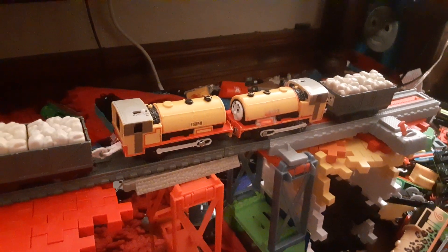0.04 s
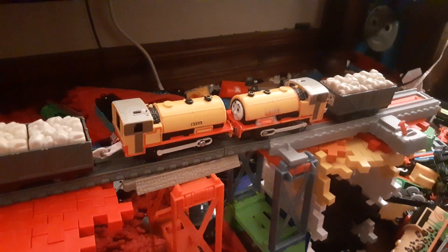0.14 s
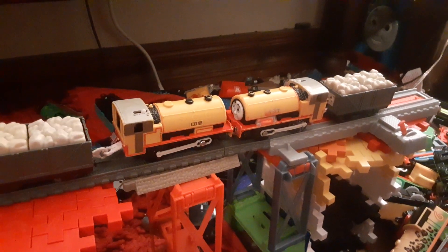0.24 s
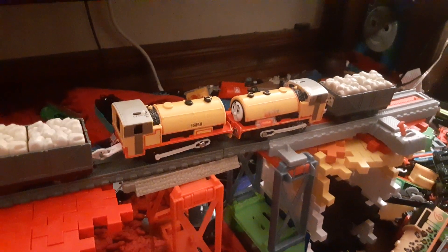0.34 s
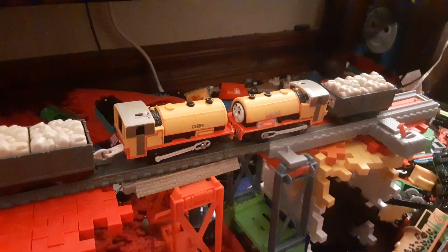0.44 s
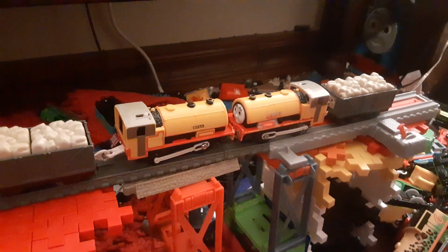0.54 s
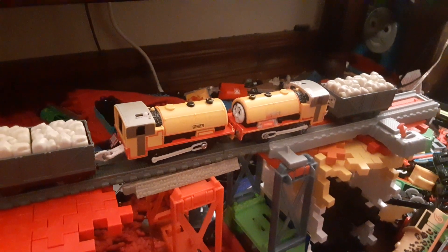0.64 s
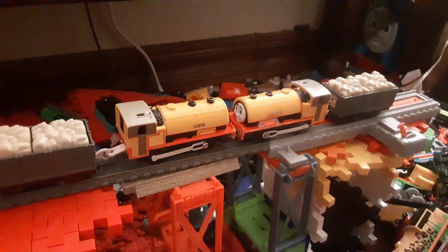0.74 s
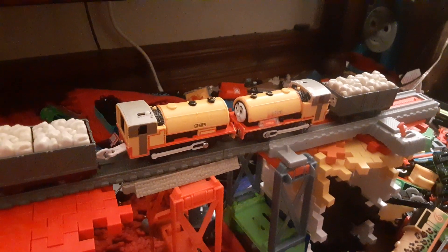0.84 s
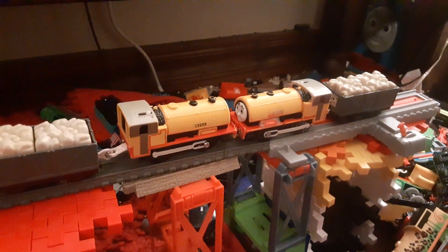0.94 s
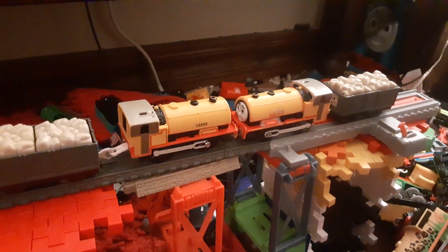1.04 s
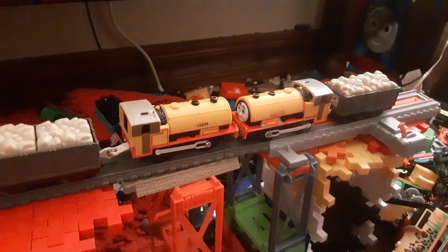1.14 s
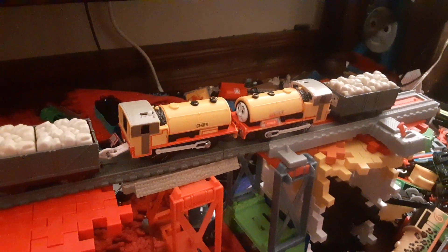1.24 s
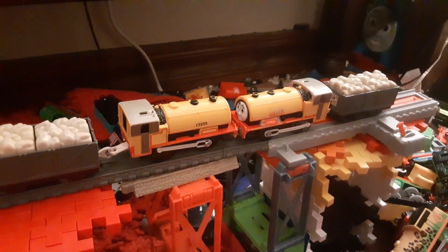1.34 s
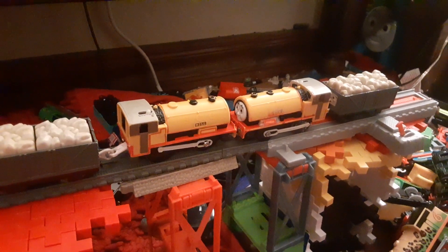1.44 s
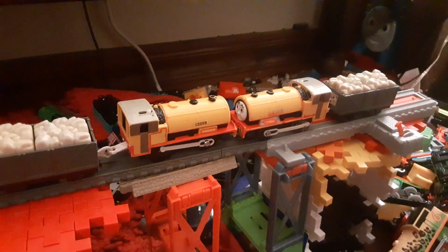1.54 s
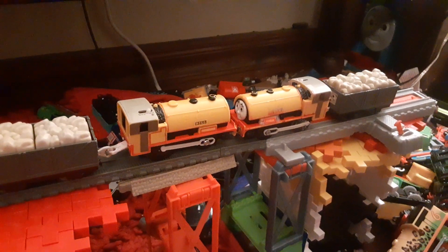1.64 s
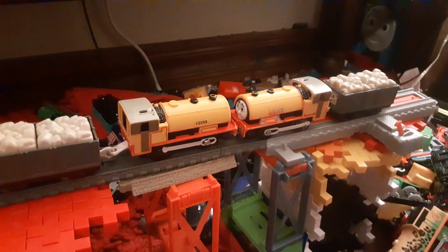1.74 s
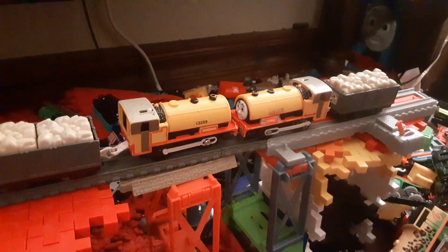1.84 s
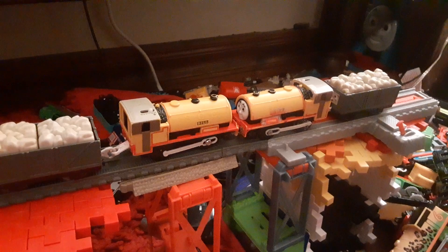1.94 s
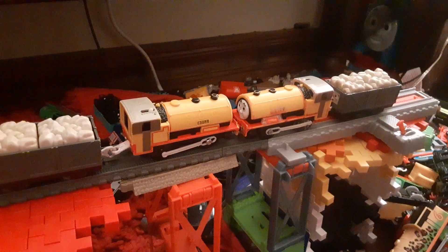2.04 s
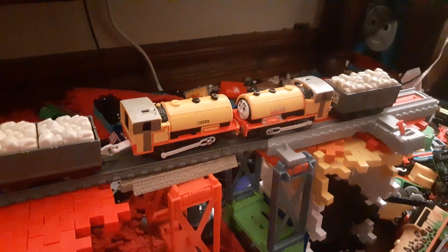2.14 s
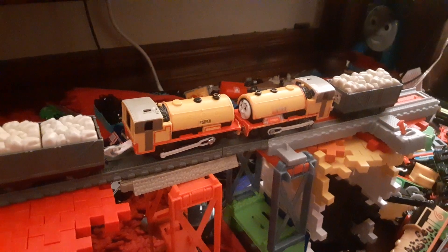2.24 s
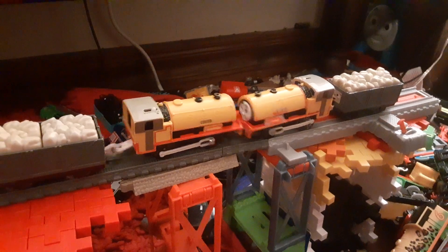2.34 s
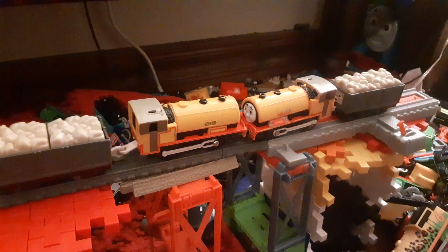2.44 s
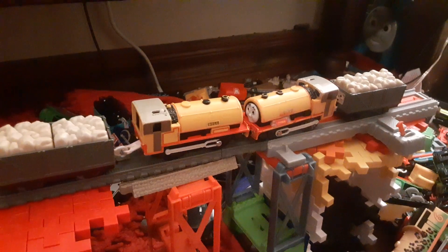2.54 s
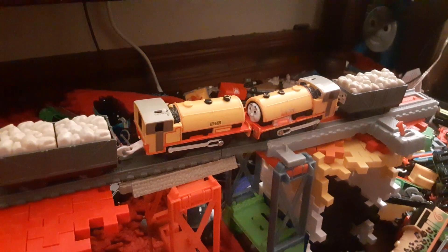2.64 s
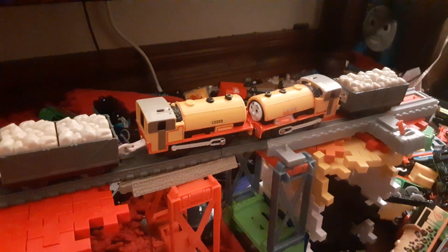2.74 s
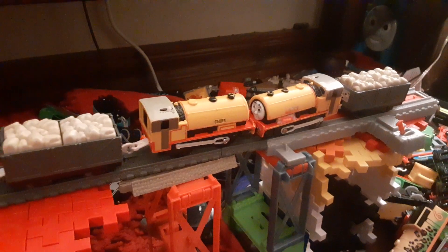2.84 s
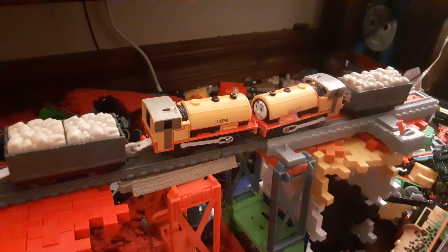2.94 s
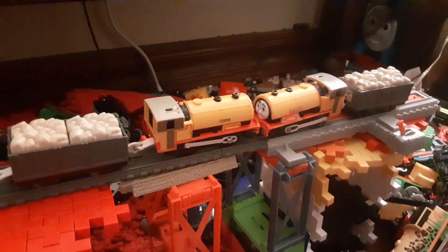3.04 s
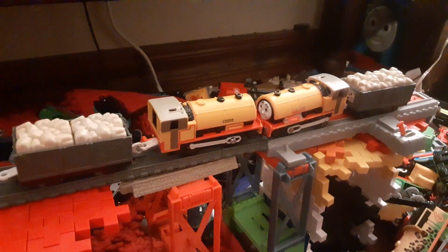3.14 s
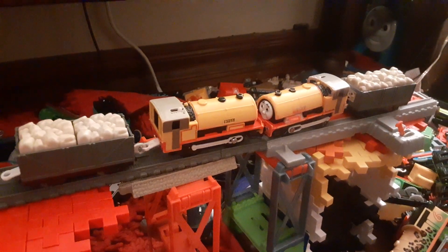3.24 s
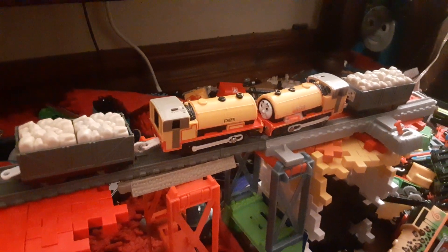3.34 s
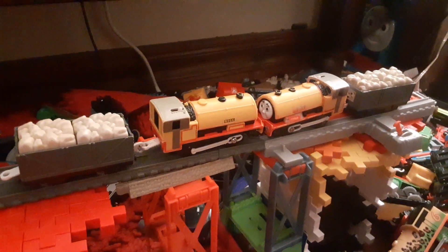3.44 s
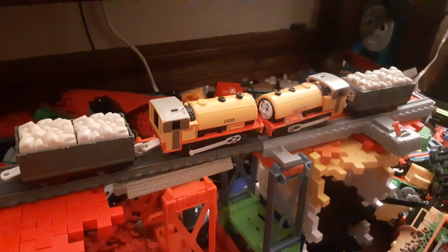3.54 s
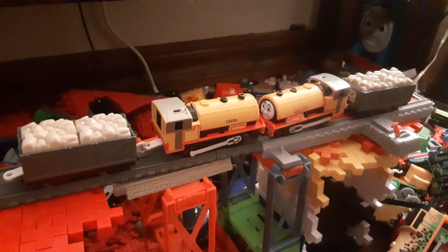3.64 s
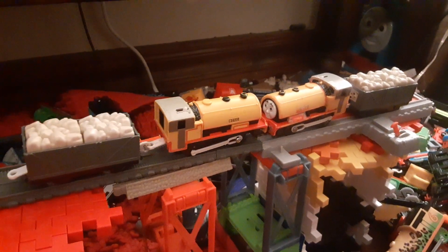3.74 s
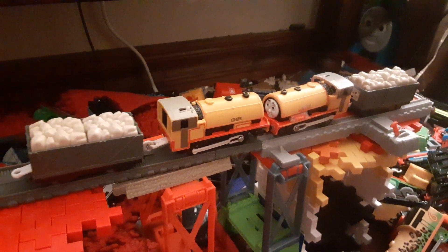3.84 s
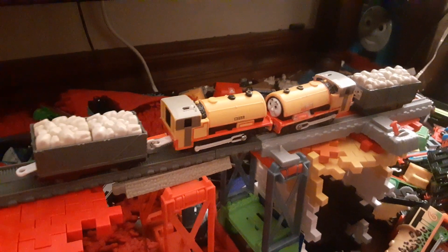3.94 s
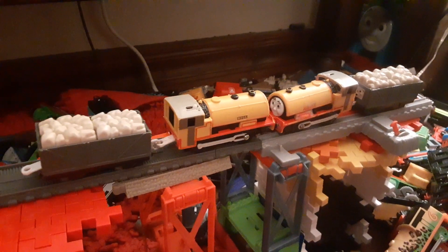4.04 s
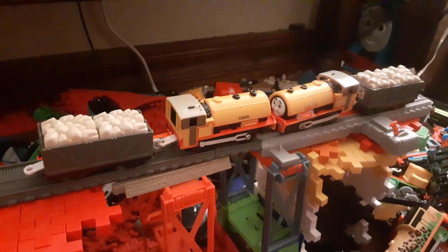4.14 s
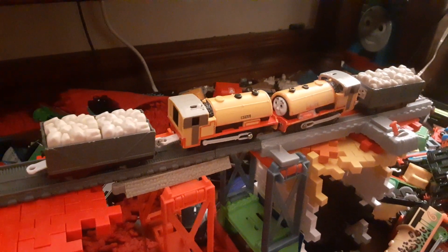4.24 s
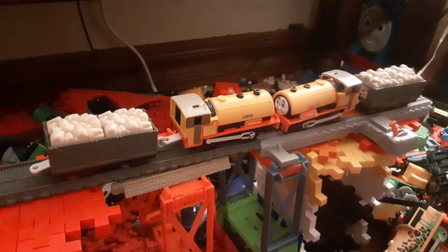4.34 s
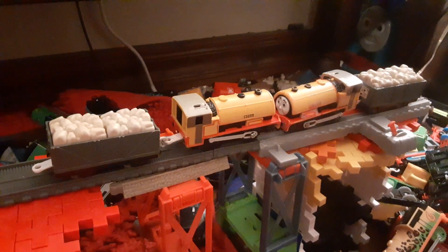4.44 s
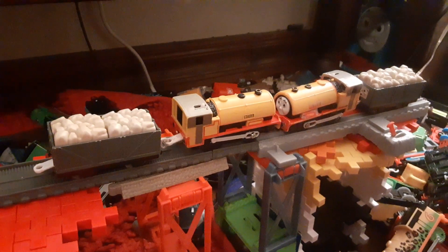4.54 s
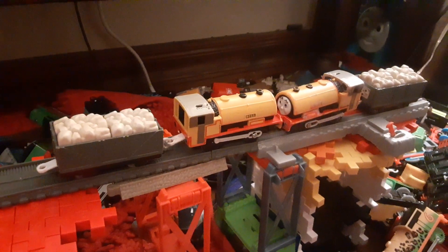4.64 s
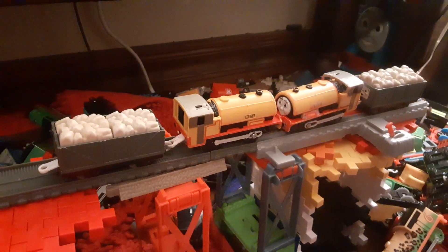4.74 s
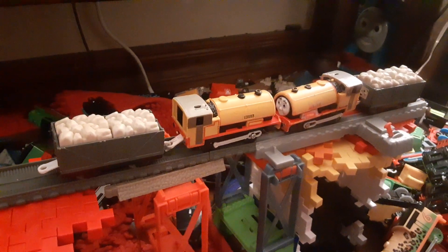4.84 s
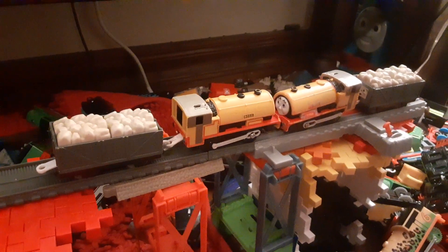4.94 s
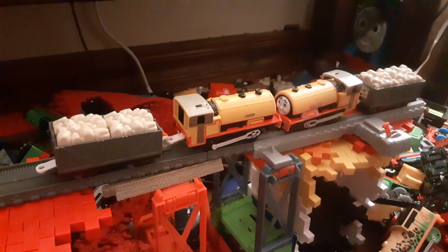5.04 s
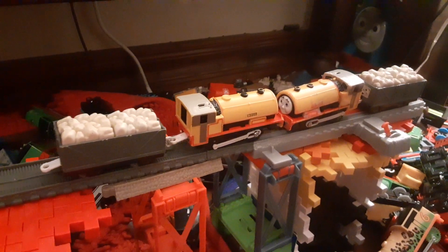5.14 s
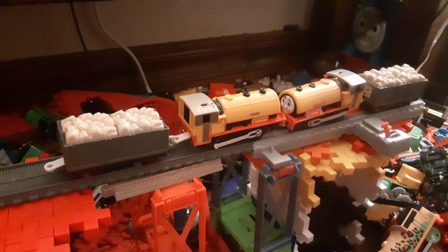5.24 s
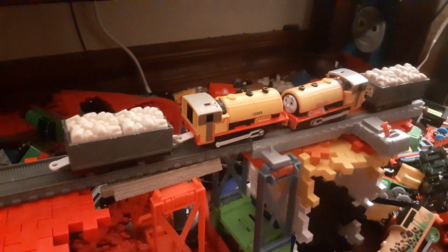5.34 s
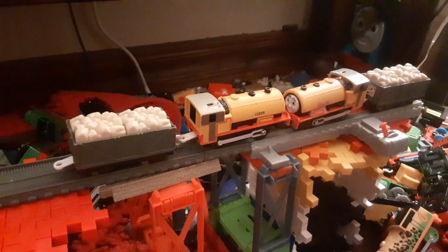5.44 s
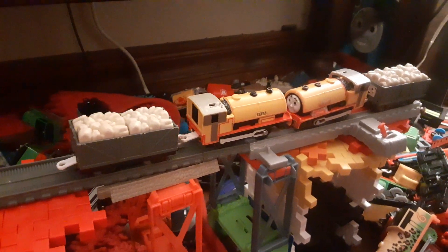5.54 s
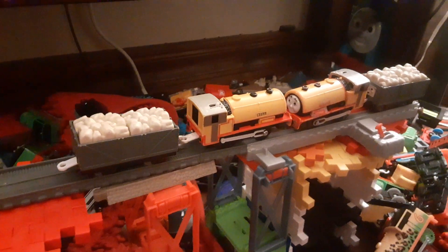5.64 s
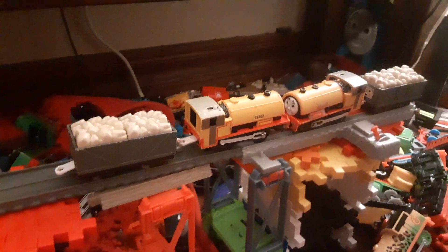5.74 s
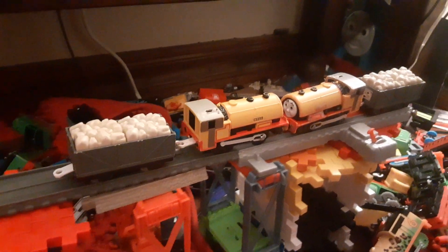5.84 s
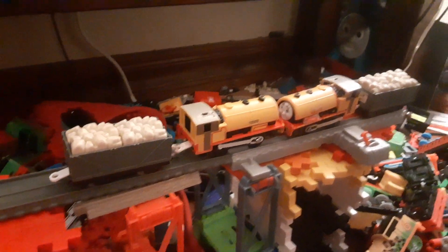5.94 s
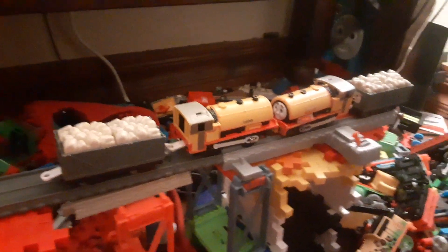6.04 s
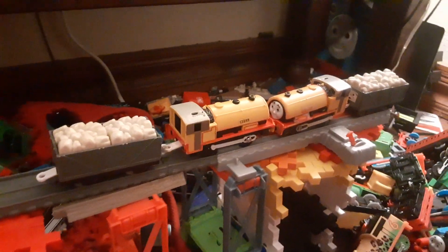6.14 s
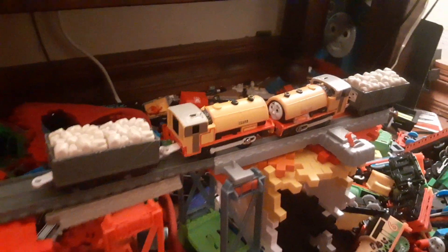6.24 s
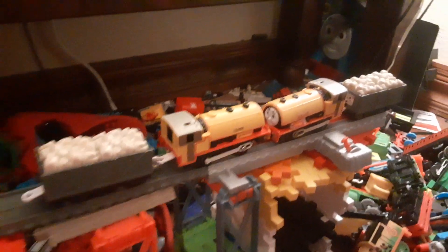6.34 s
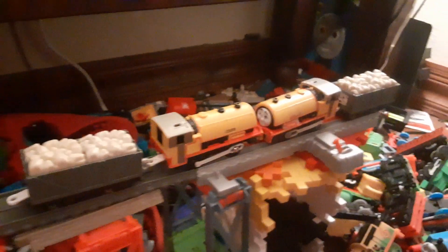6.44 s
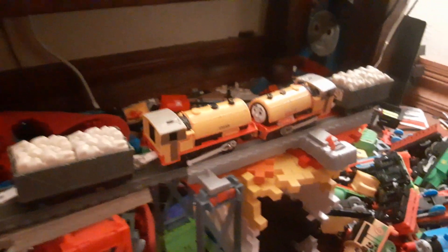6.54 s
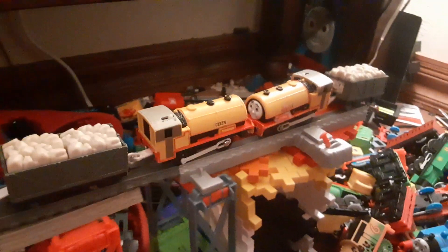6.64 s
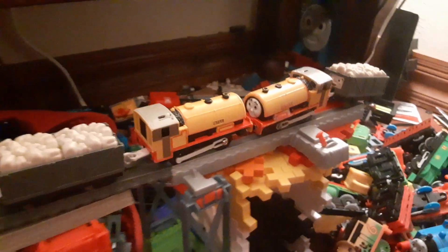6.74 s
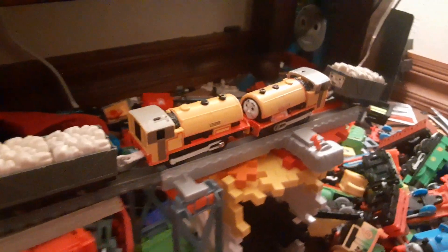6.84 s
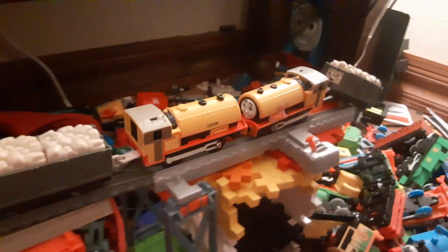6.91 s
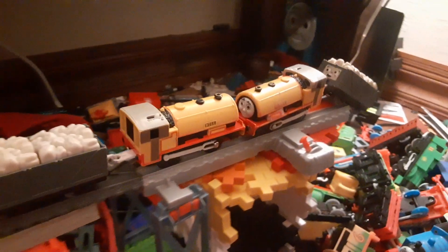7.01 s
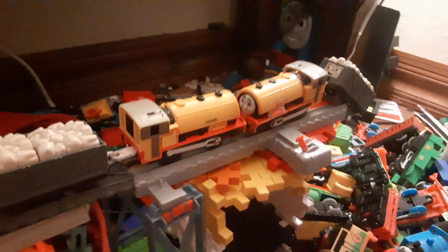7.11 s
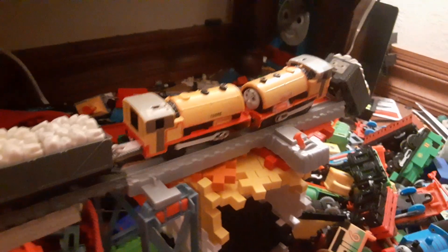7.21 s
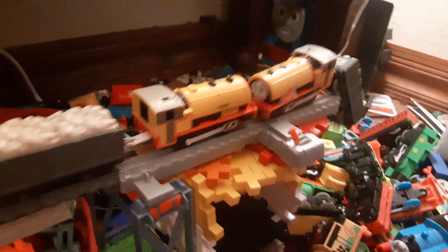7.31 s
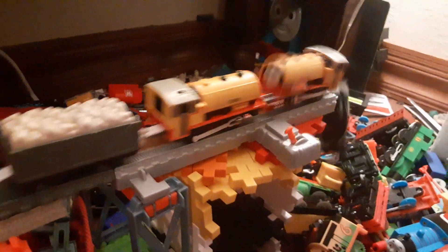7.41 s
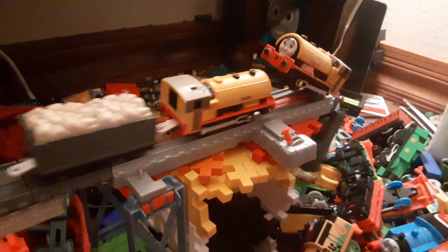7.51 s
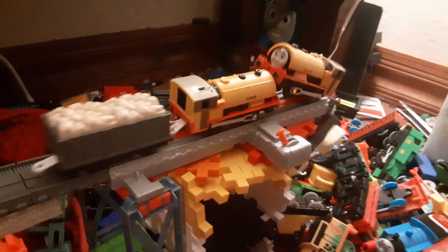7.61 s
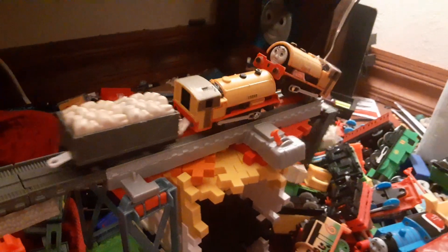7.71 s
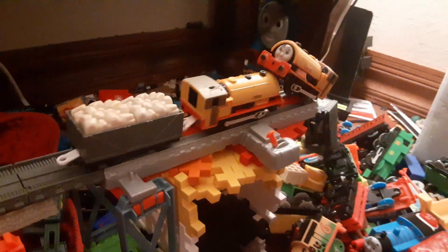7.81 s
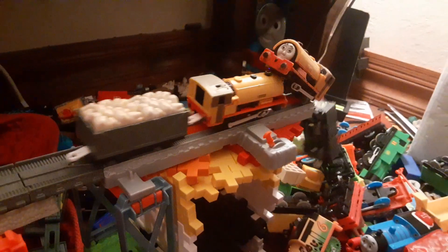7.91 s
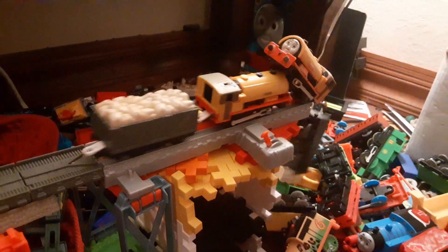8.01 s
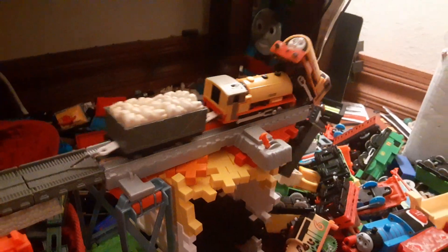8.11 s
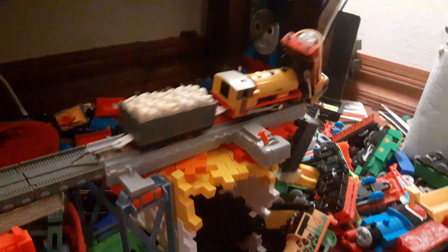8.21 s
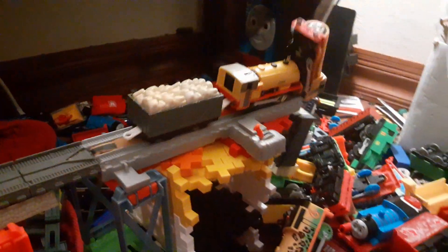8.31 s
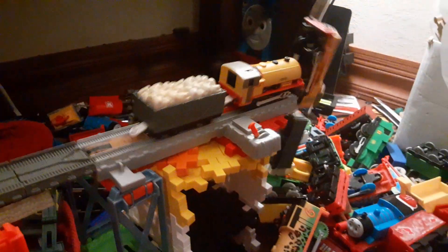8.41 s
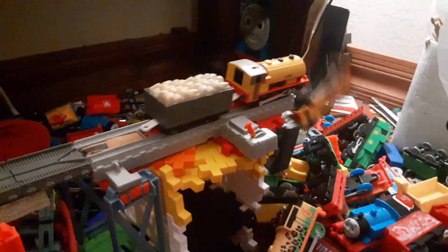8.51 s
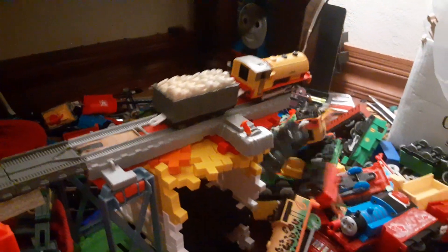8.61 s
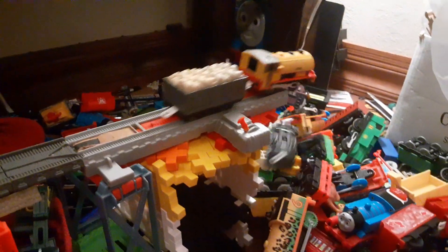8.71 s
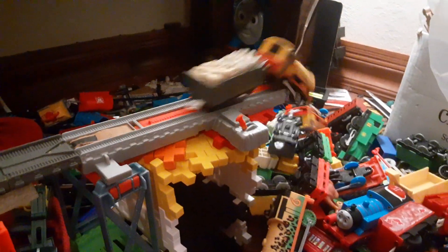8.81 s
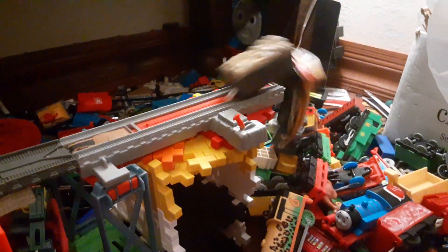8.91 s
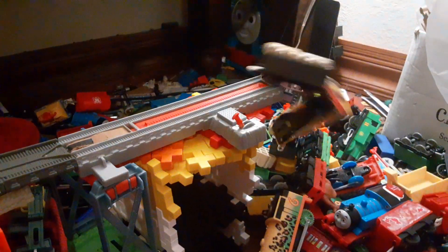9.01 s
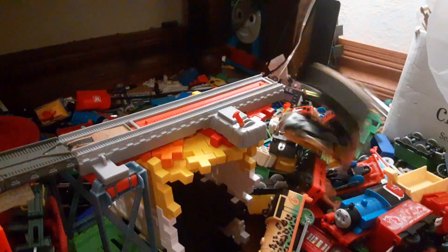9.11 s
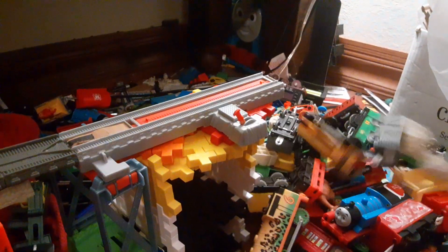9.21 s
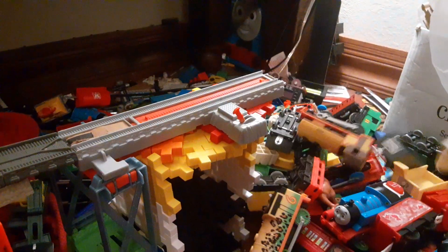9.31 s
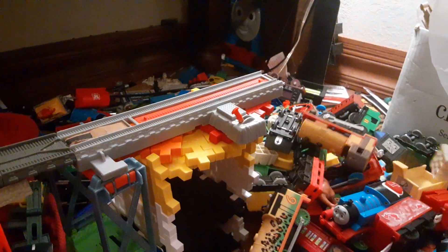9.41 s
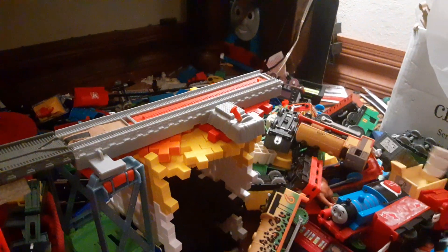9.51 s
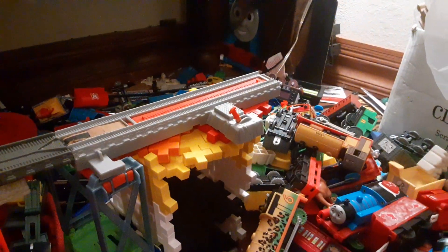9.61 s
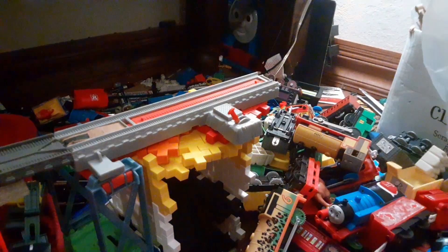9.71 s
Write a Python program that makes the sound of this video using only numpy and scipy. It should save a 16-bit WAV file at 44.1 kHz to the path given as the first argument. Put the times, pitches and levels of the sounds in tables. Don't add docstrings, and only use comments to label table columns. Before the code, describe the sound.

Close to a small microphone indoors, two battery toy engines push against each other on raised plastic track. Their geared motors grind in uneven surges while wheels tick rapidly over ribs. At about seven seconds an edge stutters over the track end, freed gears race loudly, and two falls onto plastic toys bring cracks, snaps, hollow knocks and clatter. Low hum and room rumble sit beneath.

```python
import sys
import numpy as np
from scipy import signal
from scipy.io import wavfile
from scipy.ndimage import uniform_filter1d

SR = 44100
rng = np.random.default_rng(int(sys.argv[2]) if len(sys.argv) > 2 else 0)


def undo_db(level):
    steps = np.asarray(level, float) / 20
    return 10 ** steps


def pcm_store(signal):
    levels = np.round(np.clip(np.atleast_2d(signal), -1, 1) * 32767)
    wavfile.write(sys.argv[1], SR, levels.astype(np.int16).T)


N = 430416
T = np.arange(N) / SR

# (frequency [Hz], density [dB per Hz])
SPINNING_SHELL = [(290, -38.5), (500, -26), (742, -26.5), (938, -20), (1020, -20), (1800, -17),
                  (2300, -14.5), (2650, -13.5), (3930, -9.5), (7000, 2), (8900, -18), (9800, -15.5),
                  (10900, -7.5), (14900, -5), (15800, -10), (16500, -44)]
# (time [s], peak [dB])
RIB_SKIPS = [(0.0242, -27), (0.084, -38), (0.1227, -25), (0.156, -17), (0.1813, -21), (0.2124, -17),
             (0.245, -28), (0.2667, -26), (0.328, -38), (0.3666, -27.5), (0.4182, -25.5), (0.466, -32),
             (0.509, -22.5), (0.5524, -34), (0.582, -31), (0.629, -25), (0.6795, -20.5), (0.711, -32),
             (0.7485, -21.5), (0.7855, -17.5), (0.807, -21), (0.852, -22.5), (0.8853, -28), (0.9257, -23),
             (0.9647, -34), (1.0078, -26.5), (1.069, -27.5), (1.1, -34), (1.112, -24), (1.2008, -49),
             (1.233, -33), (1.278, -22), (1.3224, -32), (1.3694, -27), (1.4152, -20), (1.451, -29),
             (1.4823, -16.5), (1.5325, -21), (1.5696, -27), (1.6886, -39), (1.7402, -28.5), (1.7893, -34),
             (1.8118, -28), (1.8315, -26), (1.863, -16), (1.918, -19), (1.947, -19), (2.0084, -35),
             (2.04, -28), (2.0788, -21.5), (2.185, -25), (2.2302, -25), (2.253, -26), (2.273, -32),
             (2.3034, -22.5), (2.3507, -19), (2.4015, -15.5), (2.327, -18), (2.457, -21), (2.571, -27),
             (2.4833, -30), (2.5105, -29), (2.5394, -17.5), (2.6, -20.5), (2.6374, -24.5),
                (2.671, -23.5), (2.704, -34), (2.745, -33), (2.7605, -27), (2.799, -21.5), (2.8812, -24),
                (2.9243, -28), (2.9467, -26), (2.9997, -24), (3.025, -29), (3.0574, -20), (3.0974, -37),
                (3.197, -31), (3.2206, -29), (3.236, -25.5), (3.3157, -25.5), (3.3495, -20.5),
                (3.4063, -20), (3.4357, -25), (3.456, -21), (3.467, -24.5), (3.5353, -27), (3.5686, -23),
                (3.6514, -23.5), (3.695, -27.5), (3.779, -21), (3.807, -25), (3.8438, -22.5), (3.8784, -24),
                (3.911, -21), (3.9404, -22.5), (3.9595, -26), (4.0055, -23), (4.029, -22), (4.058, -20.5),
                (4.086, -24), (4.116, -19), (4.1483, -21.5), (4.168, -22.5), (4.182, -22), (4.278, -37),
                (4.3146, -27), (4.37, -30), (4.412, -26), (4.4535, -27.5), (4.477, -28), (4.4894, -23.5),
                (4.523, -22), (4.549, -22.5), (4.586, -25), (4.6264, -29), (4.6594, -26), (4.724, -21.5),
                (4.7446, -24.5), (5.272, -25),
             (4.7565, -24), (4.8178, -23), (4.846, -19), (4.901, -24), (4.9319, -23), (4.9636, -22.5),
              (4.995, -23), (5.059, -28), (5.097, -24), (5.133, -22.5), (5.1713, -24), (5.2065, -24.5),
              (5.2466, -25), (5.301, -24), (5.332, -33), (5.3644, -21.5), (5.42, -22), (5.4813, -24.5),
              (5.5128, -22.5), (5.543, -27), (5.574, -23.5), (5.6473, -23), (5.735, -30), (5.774, -24),
              (5.8158, -30.5), (5.878, -34), (5.895, -25), (5.9641, -24), (5.9937, -23.5), (6.012, -22.5),
              (6.164, -30), (6.187, -23.5), (6.2816, -27), (6.3197, -23), (6.35, -27), (6.418, -32),
              (6.451, -22), (6.488, -20), (6.5406, -21.5), (6.605, -19), (6.64, -22.5), (6.661, -26),
              (6.674, -24), (6.71, -21.5), (6.7374, -21.5), (6.763, -18), (6.79, -22), (6.815, -14.5),
              (6.8393, -21), (6.867, -20.5), (6.8955, -19.5), (6.918, -22), (6.944, -15), (6.9688, -32),
              (6.992, -16), (7.0188, -16.5), (7.067, -21), (7.1094, -16), (7.1493, -14), (7.1848, -19)]
ALL_SKIPS = RIB_SKIPS


def evened(x):
    return x / np.sqrt(np.mean(x ** 2) + 1e-20)


def read(points, hz):
    f, value = np.transpose(points)
    return np.interp(np.log(hz + 1), np.log(f + 1), value)


def curves(rows):
    s, *columns = np.transpose(rows)
    return [np.interp(T, s, c) for c in columns]


def colour(x, points, size=2048):
    hz = abs(np.fft.fftfreq(2 * size, 1 / SR))
    db = np.maximum(read(points, hz), -100)
    spectrum = np.exp(np.conj(signal.hilbert(np.log(undo_db(db)))))
    fir = np.fft.ifft(spectrum).real[:size]
    return signal.oaconvolve(x, fir)[:len(x)]


def ring(x, hz, width_hz, count=1):
    turn = np.exp(2j * np.pi * np.cumsum(hz * np.ones(x.shape[-1])) / SR)
    r = np.exp(-np.pi * width_hz / SR)
    smoothed = signal.lfilter([(1 - r) ** count], np.poly([r] * count), x * np.conj(turn))
    return 2 * (turn * smoothed).real


def drift(size):
    return evened(uniform_filter1d(uniform_filter1d(rng.standard_normal(N), size), size))


def add(mix, s, sound):
    part = mix[..., round(s * SR):][..., :sound.shape[-1]]
    part += sound[..., :part.shape[-1]]


def sides(pan_db):
    return undo_db(np.array([pan_db / 2, -pan_db / 2]))


def heard(strands, lead, same):
    other = same * strands[0] + np.sqrt(1 - same ** 2) * strands[1]
    other = other + signal.lfilter(*signal.butter(1, 900, fs=SR), strands[0] - other)
    return np.array([strands[0], np.roll(other, lead)])


def contacts(per_s, spread_db):
    size = undo_db(spread_db * np.minimum(rng.exponential(1, N), 3)) * rng.choice([-1., 1.], N)
    return evened(size * (rng.random(N) < per_s / SR))


def bouts(rows, rise_db_per_s, fall_db_per_s):
    t = T[::32]
    power = np.zeros(len(t))
    for s, hold, db, *_ in rows:
        early, late = np.maximum(s - t, 0), np.maximum(t - s - hold, 0)
        power += undo_db(2 * (db - rise_db_per_s * early - fall_db_per_s * late))
    return np.interp(T, t, power)


def burst(rise_s, t60, tail_db, tail_t60):
    t = np.arange(2000) / SR
    shape = undo_db(-60 * t / t60) + undo_db(tail_db - 60 * t / tail_t60)
    shape *= (1 - np.exp(-t / rise_s)) / shape.max()
    sound = rng.standard_normal(len(t)) * shape
    return sound * np.linalg.norm(shape[:200]) / np.linalg.norm(sound[:200])


def body(x, rings_db):
    # (frequency [Hz], density [dB per Hz])
    loaded_shell = [(290, -53), (500, -51), (952, -22), (1130, -18.5), (1290, -16), (1670, -6.5),
                    (1950, -12), (2800, -5), (3200, 3), (5510, -4), (6660, 6), (8800, -21.5), (9800, -20.5),
                    (12500, -6.5), (14500, -11), (15800, -12), (16500, -47)]
    # (frequency [Hz], width [Hz], lift [dB])
    near_modes = [(1160, 76, 8), (1630, 71, 5.5), (2120, 47, 3), (2470, 49, 5.5), (3060, 89, -6),
                  (4140, 190, -0.5), (4500, 140, 2)]
    far_modes = [(1200, 130, -1.5), (1650, 150, 2), (2500, 44, 8.5), (3270, 500, -8.5), (3580, 50, 4),
                 (4010, 240, 1), (4480, 82, 2.5), (4720, 310, 1)]
    t = np.arange(1500) / SR
    far = np.interp(T, [2.1, 3.8], [0, 1])[:len(x)]

    def rung(modes):
        response = np.zeros(len(t))
        for hz, w, db in modes:
            response += undo_db(db) * np.pi * w / SR * np.exp(-np.pi * w * t) * np.cos(2 * np.pi * hz * t)
        return signal.oaconvolve(x, response)[:len(x)]

    rings = (1 - far) * rung(near_modes) + far * rung(far_modes)
    return colour(x + 2 * undo_db(rings_db) * rings, loaded_shell)


def hard_shell(pair):
    unit = np.linalg.norm(colour(signal.unit_impulse(4000), SPINNING_SHELL))
    return np.array([colour(x, SPINNING_SHELL) for x in pair]) / unit


def gears():
    # (time [s], share [0-1])
    freed_share = [
        (0, 0.24),
        (6.6, 0.29),
        (7.3, 0.81),
        (7.9, 0.9),
        (9.76, 1),
    ]
    # (time [s], centre [Hz], level against grind [dB])
    gearbox = [(0.0, 3040, -13), (2.7, 3070, -10.5), (5.3, 3250, -7), (6.65, 3270, -10), (6.72, 3100, -8.5),
               (7.25, 3170, -9), (7.6, 3060, -25), (8.2, 2970, -27), (8.45, 2940, -19), (8.7, 3050, -21),
               (8.95, 3220, -18), (9.25, 3050, -14.5), (9.76, 2900, -34)]
    # (time [s], centre [Hz], level against grind [dB])
    whine_curve = [(7.8, 5140, -14), (8.11, 5000, -16), (8.13, 4800, -7), (8.24, 4960, -10),
                   (8.3, 5400, -12), (9.76, 4960, -26)]
    # (time [s], upper wall [Hz], level against grind [dB])
    cab_song = [(6.65, 3100, -30), (6.72, 3150, -21), (7.1, 3150, -33), (7.27, 3120, -19), (7.4, 3140, -17),
                (7.85, 3120, -19), (7.92, 3160, -18), (8.1, 3100, -19), (8.18, 3220, -18), (8.3, 3100, -16),
                (8.45, 3020, -30)]
    freed = curves(freed_share)[0]
    box_hz, box_db = curves(gearbox)
    whine_hz, whine_db = curves(whine_curve)
    song_hz, song_db = curves(cab_song)
    flutter = undo_db(3 * drift(size=100) * (1 - freed))

    teeth = np.array([contacts(per_s=3000, spread_db=2.8) + 0.53 * rng.standard_normal(N) for _ in range(2)])
    loaded = evened(np.array([body(x, rings_db=1) for x in teeth]))
    spinning = evened(np.array([colour(x, SPINNING_SHELL) for x in teeth]))
    box = undo_db(box_db) * evened(ring(teeth, box_hz, width_hz=800, count=2))
    whine = undo_db(whine_db) * freed * evened(ring(teeth, whine_hz, width_hz=500, count=2))
    upper_wall = evened(ring(teeth, song_hz, width_hz=120))
    lower_wall = evened(ring(teeth, 0.858 * song_hz, width_hz=99))
    song = undo_db(song_db) * (upper_wall + lower_wall)

    no_bass = signal.butter(2, 1250, "high", fs=SR, output="sos")
    on_track = signal.sosfilt(no_bass, np.sqrt(1 - freed) * loaded + box + song + whine)
    strands = (on_track + np.sqrt(freed) * spinning) * flutter

    motor_hz = 178.1 * (1 + 0.1 * drift(size=5000))
    throb_db = 3 * np.cos(2 * np.pi * np.cumsum(motor_hz) / SR) * (1 - freed)
    ease = np.sin(np.pi * (ribs_passed() % 1) ** 1.7)
    ease_db = 11.5 * ease * np.maximum(0.55 - freed, 0)
    return undo_db(0.11 + throb_db - ease_db) * grind() * strands


def grind():
    # (time [s], grind [dB])
    idle = [(0.0, -46), (2.2, -49.5), (2.6, -43), (4.1, -43.5), (4.25, -45), (4.7, -43.5), (6.65, -44.5),
            (7.11, -32), (8.19, -28.5), (8.245, -31.5), (8.27, -27.5), (9.4, -25), (9.54, -30.5),
            (9.56, -28), (9.76, -28)]
    # (start [s], hold [s], grind [dB])
    shoves = [(0.0, 0.016, -53), (.16, 0.13, -39.5), (.516, 0.0087, -41.5), (.64, 0.028, -33),
              (.8, 0.14, -40), (1.29, .01, -47), (1.47, 0.047, -36), (1.87, 0.16, -36), (2.315, 0.21, -33),
              (3.0, .04, -39), (3.355, 0.066, -38.5), (3.53, 0.015, -38.5), (3.8, 0.069, -46),
              (3.93, 0.17, -39), (4.51, .04, -39.5), (4.77, 0.26, -39), (5.265, 0.33, -38.5),
              (5.93, 0.13, -42), (6.34, 0.24, -40), (6.72, 0.12, -38.5)]
    # (start [s], hold [s], grind [dB])
    jolts = [(7.2, 0.11, -27), (7.37, 0.11, -25.5), (7.55, 0.13, -27.5), (8.3, 0.016, -33),
             (8.43, 0.1, -24), (8.56, 0.12, -21.5), (8.7, 0.18, -24.5), (8.935, 0.072, -20),
             (9.07, 0.047, -25.5), (9.17, 0.093, -23), (9.383, 0.024, -25)]
    power = undo_db(2 * curves(idle)[0])
    power = power + bouts(shoves, rise_db_per_s=154, fall_db_per_s=146)
    return np.sqrt(power + bouts(jolts, rise_db_per_s=446, fall_db_per_s=380))


def ribs_passed():
    s = np.sort([row[0] for row in ALL_SKIPS])
    return np.interp(T, s, np.arange(len(s)))


def wandering(x, patchy_db):
    z = signal.stft(x, nperseg=256)[2]
    patches = rng.standard_normal(z.shape[-2:][::-1]).T
    patches = uniform_filter1d(patches, size=4, axis=0)
    patches = evened(uniform_filter1d(patches, size=24, axis=1))
    return signal.istft(z * undo_db(patchy_db * patches), nperseg=256)[1][..., :N]


def skips():
    out = np.zeros((2, N))
    for s, db in ALL_SKIPS:
        pair = [burst(rise_s=0.00091, t60=0.011, tail_db=-16, tail_t60=0.087) for _ in range(2)]
        add(out, s, undo_db(db) * np.array(pair))
    out = signal.lfilter([1, -0.61], [1], out)
    unit = np.linalg.norm(body(signal.unit_impulse(4000), rings_db=-31.5))
    return undo_db(3) * np.array([body(x, rings_db=-1.5) for x in out]) / unit


def cracks():
    # (time [s], peak [dB], ring [Hz], low part [dB], left-right [dB])
    crack_rows = [(7.185, -17, 2920, -27, 5), (7.362, -12, 3440, -26, 8), (7.4298, -7, 3180, -19, 8),
                  (7.5341, -1.5, 1170, -25.5, 4.5), (7.598, -13.5, 3240, -17, 6),
                  (7.7762, -35, 2550, 4.5, 0), (8.264, -9, 3420, -56, -11), (8.4316, -3.5, 2630, -33, 3),
                  (8.5664, -9, 2770, -17, 2), (8.6096, -9.5, 3160, -39, -7), (8.6543, -8.5, 2460, -34, 0),
                  (8.9327, -9, 2700, -42, -7), (8.9666, -5.5, 2760, -23, 8), (8.9891, -7, 3400, -17, 3),
                  (9.1621, -10.5, 1200, -39, -3), (9.2, -7, 2660, -21, 4), (9.2362, -5, 2560, -36, 0),
                  (9.2576, -8, 2580, -23, -1), (9.3418, -4.5, 2470, -46, -4), (9.5525, -33, 2650, -35, 1)]
    out = np.zeros((2, N))
    for s, db, hz, low_db, pan_db in crack_rows:
        pair = [burst(rise_s=0.00098, t60=0.031, tail_db=-9, tail_t60=0.074) for _ in range(2)]
        low = np.array([ring(x, hz, width_hz=440) for x in pair])
        both = hard_shell(pair) + undo_db(low_db + 27) * low
        add(out, s, undo_db(db - 1.5) * heard(both, lead=-4, same=0.11) * sides(pan_db)[:, None])
    return out


def snaps():
    # (time [s], peak [dB])
    snap_rows = [(7.3402, -16), (7.368, -9), (7.4061, -12), (7.4124, -15), (7.427, -9), (7.4374, -8),
                 (7.5458, -5.5), (8.511, -11), (8.5814, -2.5), (8.6224, -3.5), (8.6704, -5), (8.6834, -8),
                 (8.9424, -5), (8.9578, -7), (8.9954, -13), (9.1684, -6), (9.1777, -12), (9.2134, -7),
                 (9.3474, -5.5), (9.3544, -11)]
    out = np.zeros((2, N))
    for s, db in snap_rows:
        pair = [burst(rise_s=0.00067, t60=0.021, tail_db=-12, tail_t60=0.082) for _ in range(2)]
        add(out, s, undo_db(db) * np.array(pair))
    return undo_db(-3) * heard(hard_shell(out), lead=-5, same=0.11) * sides(-1.4)[:, None]


def taps(rows, t60, lift_db):
    out, t = np.zeros(N), np.arange(1500) / SR
    for s, db, hz in rows:
        lower_hz = hz * (1 - rng.uniform(0.042, 0.19))
        pair = np.sin(2 * np.pi * hz * t) + 0.52 * np.sin(2 * np.pi * lower_hz * t)
        add(out, s, undo_db(db + lift_db - 60 * t / t60) * (1 - np.exp(-t / 0.00092)) * pair)
    return out


def small_parts():
    # (time [s], peak [dB], ring [Hz])
    stutter = [(7.2314, -29, 1630), (7.248, -32, 1780), (7.2644, -31, 1780), (7.2814, -28, 1730),
               (7.2946, -28, 1890), (7.3044, -28, 1730), (7.318, -28, 1960), (7.3292, -21, 1800),
               (7.341, -18, 1810), (7.3566, -24, 1910), (7.3684, -22, 1730), (7.3784, -31, 1530),
               (7.4225, -24, 1920), (7.467, -23.5, 1900), (7.8204, -27, 1680), (7.842, -25, 1950)]
    # (time [s], peak [dB], ring [Hz])
    toy_taps = [(8.4318, -13, 4300), (8.5433, -19, 2590), (8.565, -24, 2670), (8.6504, -12.5, 2430),
                (8.7967, -15.5, 1850), (8.834, -18, 2720), (8.866, -19, 2540), (8.9655, -13, 2710),
                (8.9891, -2.5, 3410), (9.0639, -18, 2980), (9.0948, -23, 2980), (9.1626, -21, 2500),
                (9.177, -10, 3270), (9.2026, -17, 3000), (9.236, -7.5, 4170), (9.301, -18, 2580),
                (9.4006, -22, 4400), (9.4331, -22, 3600), (9.491, -20, 4180), (9.6675, -24, 3470)]
    edge = taps(stutter, t60=0.011, lift_db=7.5) * sides(8.9)[:, None]
    return edge + taps(toy_taps, t60=0.021, lift_db=-4) * sides(-2.1)[:, None]


def clatter():
    # (start [s], hold [s], level [dB], centre [Hz])
    tumbles = [(6.68, 0.9, -51, 1370), (7.22, 0.066, -42, 1700), (7.35, 0.031, -32, 1500),
               (7.43, 0.019, -31, 1530), (7.53, 0.051, -32, 1290), (7.71, 0.1, -32.5, 1140),
               (7.82, 0.018, -34, 2010), (7.95, 0.15, -44, 1100), (8.4, 0.093, -32, 1930),
               (8.58, 0.18, -31.5, 1830), (8.76, 0.24, -33, 1500), (9.06, 0.099, -39, 1000),
               (9.17, 0.09, -41, 1700), (9.3, 0.037, -36, 910), (9.43, 0.18, -44.5, 905)]
    middle_s = [s + hold / 2 for s, hold, *_ in tumbles]
    hz = np.interp(T, middle_s, [row[3] for row in tumbles])
    band = signal.butter(2, [450, 2600], "band", fs=SR, output="sos")
    pair = [contacts(per_s=1100, spread_db=6) for _ in range(2)]
    pair = [evened(signal.sosfilt(band, 0.33 * x + ring(x, hz, width_hz=1100))) for x in pair]
    strength = np.sqrt(bouts(tumbles, rise_db_per_s=352, fall_db_per_s=155))
    return undo_db(-5.5) * strength * heard(pair, lead=-2, same=0.24)


def knocks():
    # (time [s], peak [dB], ring [Hz])
    bumps = [
        (4.815, -43, 288),
        (4.861, -45, 300),
        (5.101, -40.5, 290),
        (6.03, -38.5, 300),
        (6.634, -39, 280),
        (6.71, -39, 1150),
        (6.809, -38.5, 1170),
    ]
    # (time [s], peak [dB], ring [Hz])
    first_drop = [(7.358, -25, 1090), (7.402, -29, 990), (7.429, -19, 1095), (7.535, -16.5, 306),
                  (7.614, -30, 1190), (7.648, -21, 373), (7.673, -24, 1160), (7.711, -17, 1204),
                  (7.736, -26, 404), (7.761, -25, 377), (7.795, -26, 380), (7.854, -30, 420),
                  (7.915, -27, 2740), (8.291, -24.5, 2700), (8.4, -26, 2040), (8.435, -28, 1510)]
    # (time [s], peak [dB], ring [Hz])
    second_landing = [(8.54, -30, 1160), (8.585, -20, 263), (8.702, -22, 290), (8.732, -28, 282),
                      (8.752, -27, 310), (8.856, -26, 250), (8.957, -24, 960), (8.991, -18, 1110),
                      (9.027, -26, 1050), (9.076, -25, 960), (9.094, -20, 1020), (9.11, -26, 880),
                      (9.173, -15.5, 1214), (9.174, -29, 304), (9.251, -28, 327), (9.266, -27, 310),
                      (9.305, -23.5, 810), (9.201, -27, 292), (9.239, -23, 210), (9.302, -17.5, 342),
                      (9.342, -27, 296), (9.369, -25.5, 368), (9.434, -26.5, 810), (9.438, -26, 326),
                      (9.491, -27, 340), (9.493, -28, 820), (9.567, -37, 810), (9.564, -26, 330),
                      (9.669, -32.5, 930)]
    out, t = np.zeros(N), np.arange(4000) / SR
    for s, db, hz in bumps + first_drop + second_landing:
        overtone_hz = 1.666 * rng.uniform(0.79, 1.014) * hz
        wall = np.sin(2 * np.pi * hz * t) + 0.14 * np.sin(2 * np.pi * overtone_hz * t)
        rough = ring(rng.standard_normal(len(t)), 1.83 * hz, width_hz=3.6 * hz)
        wall += 1.33 * rough * np.sqrt(300 / hz)
        t60 = 0.02 + 1.3 / hz
        add(out, s, undo_db(db + 8.5 - 60 * t / t60) * (1 - np.exp(-t / 0.0029)) * wall)
    return out


def rumbles():
    # (start [s], hold [s], level [dB])
    rumble_bouts = [(2.385, 0.03, -51), (3.555, 0.044, -46), (4.76, 0.063, -50), (5.09, 0.022, -55),
                    (6.01, 0.11, -47), (6.19, 0.019, -51.5), (6.64, 0.013, -50), (6.72, 0.32, -54),
                    (7.35, 0.013, -45), (7.97, 0.098, -50.5), (7.535, 0.059, -38), (7.68, 0.2, -46),
                    (8.59, 0.015, -34.5), (8.72, 0.023, -33.5), (8.86, 0.12, -44.5), (9.19, 0.094, -37.5),
                    (9.4, 0.22, -45), (9.68, 0.027, -49)]
    blows = contacts(per_s=850, spread_db=1.5)
    band = signal.butter(1, [200, 380], "band", fs=SR, output="sos")
    low = evened(signal.sosfilt(band, blows) + 0.079 * blows)
    low = signal.sosfilt(signal.butter(3, 1000, fs=SR, output="sos"), low)
    return undo_db(-2) * np.sqrt(bouts(rumble_bouts, rise_db_per_s=450, fall_db_per_s=254)) * low


def echoes(x):
    # (frequency [Hz], t60 [s])
    echo_t60 = [(300, 0.1), (2000, 0.16), (6000, 0.011), (15000, 0.033)]
    hits = np.zeros((2, SR // 2))
    at = np.arange(100, SR // 2 - 20, 20)
    at = at + rng.integers(0, 20, (2, len(at)))
    np.put_along_axis(hits, at, rng.choice([-1., 1.], at.shape), 1)
    hz, t, z = signal.stft(hits, SR, nperseg=256)
    decay = undo_db(-60 * t / read(echo_t60, hz)[:, None])
    tail = signal.istft(z * decay, SR, nperseg=256)[1]
    return signal.fftconvolve(x.mean(0)[None], tail / np.linalg.norm(tail[0]), axes=1)[:, :N]


def background():
    # (frequency [Hz], density [dB per Hz])
    room = [(15, -47), (25, -26), (48, -13), (70, -4.5), (89, -4), (109, -13.5), (206, -16), (275, -25),
            (415, -29), (600, -36), (769, -36), (961, -37.5), (1160, -33.5), (1310, -43.5), (1500, -30),
            (1950, -38), (3300, -120)]
    # (time [s], hum level [dB])
    gain_curve = [
        (0.0, -38.5),
        (7.18, -37.5),
        (7.61, -41.5),
        (8.45, -40.5),
        (8.67, -45.5),
        (9.3, -45.5),
        (9.76, -42.5),
    ]
    hum_db = curves(gain_curve)[0]
    hum = np.sqrt(2) * np.sin(2 * np.pi * 59 * T) * undo_db(0.5 * drift(size=2500))
    response = undo_db(read(room, np.linspace(0, SR / 2, 4097)))
    response[-1] = 0
    fir = signal.firwin2(8191, np.linspace(0, 1, 4097), response)
    shared, apart = (evened(signal.fftconvolve(rng.standard_normal(N), fir, "same")) for _ in range(2))
    apart = signal.lfilter(*signal.butter(1, 250, "high", fs=SR), apart)
    rumble = undo_db(-48.5 - hum_db[0]) * (shared + 0.6 * np.array([apart, -apart]))
    return undo_db(hum_db) * (hum + rumble) * sides(1.2)[:, None]


def scene():
    # (time [s], left-right [dB])
    place = [(0.0, 9), (3.7, 7.5), (4.4, 8), (5.46, 6.5), (6.93, 7.5), (7.64, 7.5), (9.76, 5)]
    strands = wandering(gears(), patchy_db=2) + skips()
    before, after = heard(strands, lead=5, same=0.26), heard(strands, lead=-4, same=0.11)
    engines = np.where(T < 7.05, before, after) * sides(curves(place)[0] - 2.2)
    near = engines + cracks() + snaps() + clatter() + small_parts()
    high_pass = signal.butter(3, 190, "high", fs=SR, output="sos")
    blows = signal.sosfilt(high_pass, knocks() + rumbles()) * sides(1.4)[:, None]
    return near + blows + echoes(undo_db(-10.5) * near + undo_db(-16) * blows) + background()


def roll_off(x):
    return signal.sosfilt(signal.butter(12, 16970, fs=SR, output="sos"), x)


def record(dry):
    # (frequency [Hz], left-right [dB])
    port_mismatch = [(60, 5), (130, 6), (290, 5), (640, 7), (1410, 5), (3100, 3.5), (6820, 3), (9500, -4.5),
                     (15000, 0.5)]
    ports = [[(hz, sign * (db - 4) / 2) for hz, db in port_mismatch] for sign in (1, -1)]
    wet = np.array([colour(x, port) for x, port in zip(dry, ports)])
    low_pass = signal.firwin(255, 15700, fs=SR)
    wet = signal.oaconvolve(wet, low_pass[None], "same", axes=1)
    return roll_off(np.clip(wet, -1, 1))


dry = scene()
out = record(dry)
pcm_store(out)
```